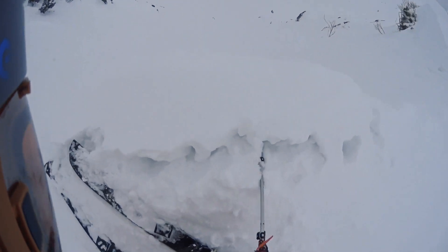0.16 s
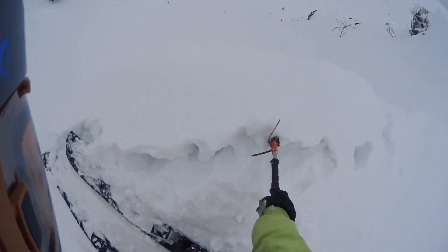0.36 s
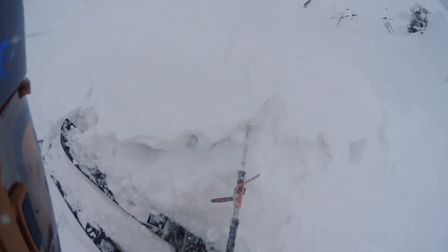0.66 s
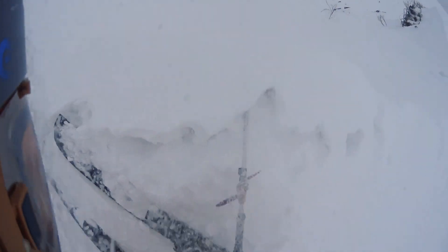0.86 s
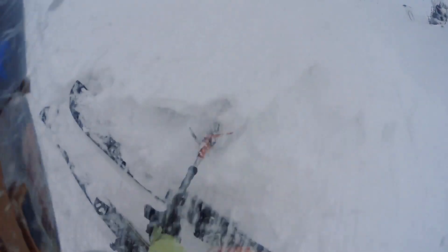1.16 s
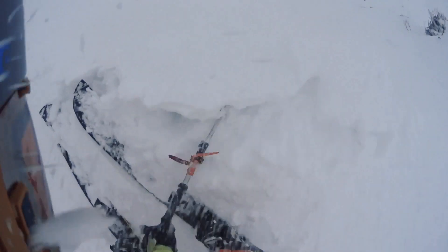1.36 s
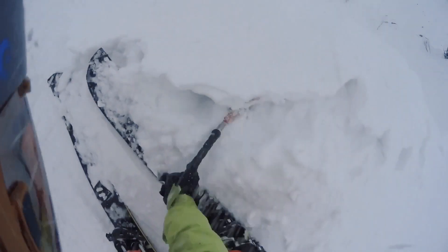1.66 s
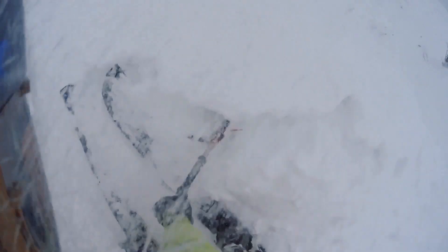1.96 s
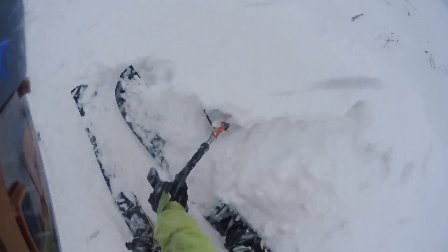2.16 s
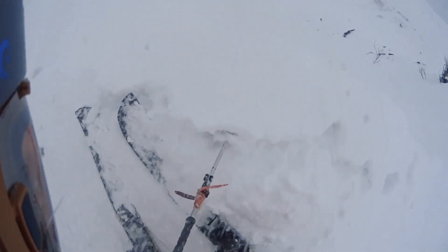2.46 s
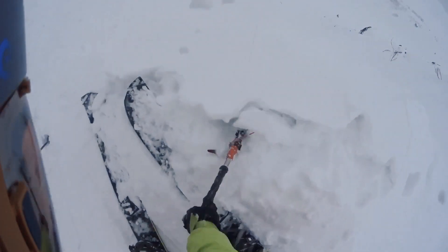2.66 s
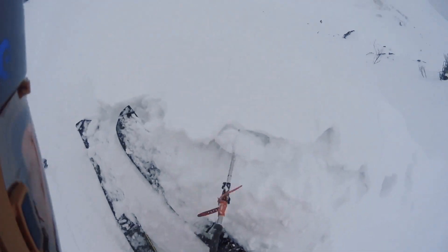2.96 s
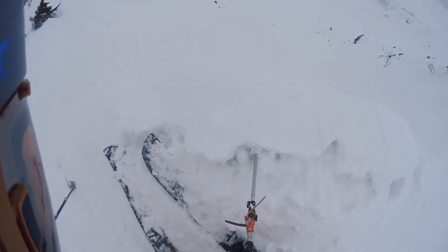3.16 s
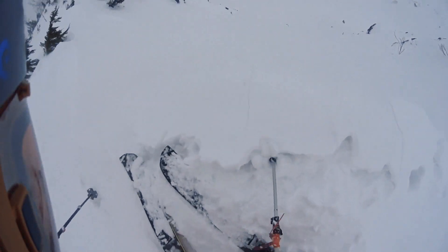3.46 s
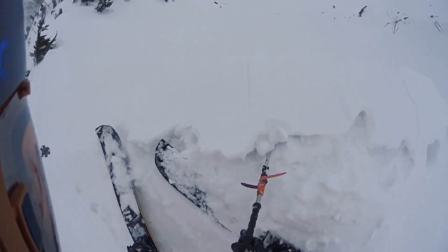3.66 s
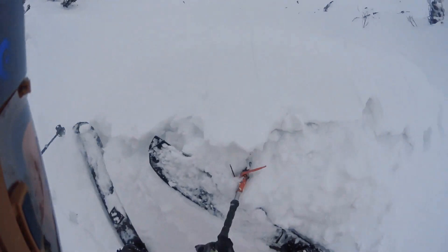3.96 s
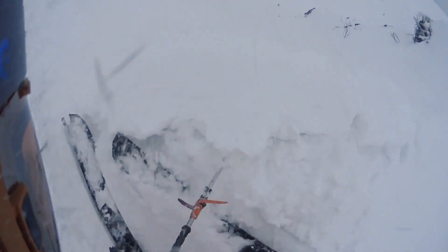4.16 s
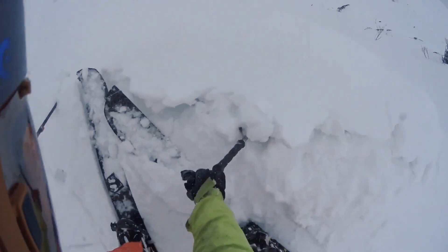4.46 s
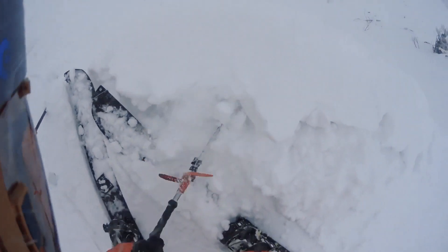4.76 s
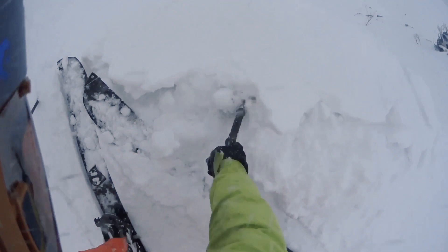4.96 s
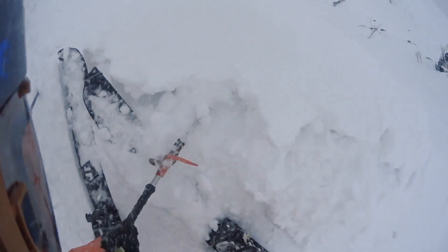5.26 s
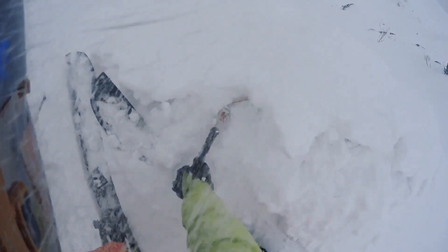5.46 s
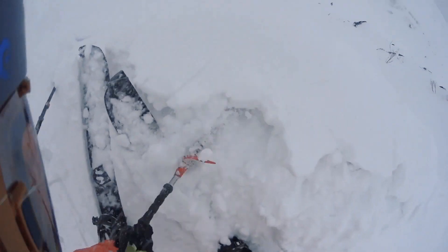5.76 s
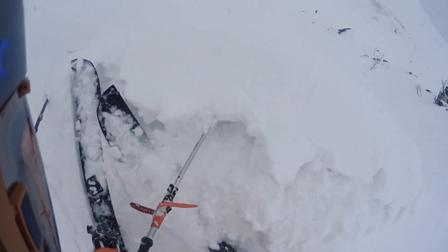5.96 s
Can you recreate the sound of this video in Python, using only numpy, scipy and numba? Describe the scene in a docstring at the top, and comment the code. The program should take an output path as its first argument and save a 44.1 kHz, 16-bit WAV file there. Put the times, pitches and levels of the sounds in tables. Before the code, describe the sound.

Open snowy slope, heard very close from a small stereo camera worn on a skier's body. Deep wind buffeting runs throughout. Packed snow crunches at first, then squalls of powder hiss and patter on the housing with soft thuds and icy ticks. The middle thins to mostly wind, then more crunching leads into a dense burst of sharp ticks and hissing snow, easing at the end.

```python
"""Skier in a snowstorm

A skier stamps and pokes into deep powder, heard by a small camera worn on the body, with two microphone ports.
Wind is coloured noise that swells in gusts; blown snow hisses as thousands of tiny hits ring the housing.
Clumps thud on the housing, ice grains tick and ring a port, the mount knocks, and pushed snow crunches.
A limiter briefly turns everything down around the loudest peaks."""
import sys
import numpy as np
from scipy import signal
from scipy.fft import rfft, irfft, next_fast_len
from scipy.io import wavfile
from scipy.ndimage import uniform_filter1d, minimum_filter1d
from numba import njit

SR = 44100
rng = np.random.default_rng(int(sys.argv[2]) if len(sys.argv) > 2 else 0)


def generate_wav(signal):
    """Clip the signal to [-1, 1] and save it as 16-bit WAV at the path in sys.argv[1]."""
    frames = np.transpose(np.atleast_2d(signal))
    scaled = np.clip(frames, -1, 1) * 32767
    pcm = np.round(scaled).astype(np.int16)
    wavfile.write(sys.argv[1], SR, pcm)


N = 269451
TIME = np.arange(N) / SR

# Snow blown against the housing, in squalls with thin drift between: [start_s, level_db]
SQUALLS = [(0, -73), (.5, -60), (.6, -34.5), (.8, -39), (1.22, -35.5), (1.45, -28), (1.75, -38),
           (1.92, -30), (2.12, -28), (2.28, -44), (2.7, -42.5), (2.8, -46.5), (3.05, -47.5), (3.6, -51),
           (4.02, -39.5), (4.17, -34), (4.55, -37), (4.8, -28.5), (5.1, -31), (5.5, -33.5), (5.8, -49.5),
           (6.11, -52)]
THICK_SNOW_DB = -31  # snow level that counts as thick
# A ski pushed through packed snow: [middle_s, length_s, level_db]
PUSHES = [(.12, 0.53, -30.5), (.45, 0.48, -31.5), (3.7, 0.36, -31.5), (3.812, 0.11, -25.5),
          (3.915, 0.19, -26), (3.97, 0.068, -21.5), (4.085, 0.25, -25)]


def undb(db):
    """Turn decibels into a gain."""
    return 10 ** (np.asarray(db) / 20)


def curve(rows, column=1, outside=None):
    """Join one column of a table by straight lines in time."""
    rows = np.asarray(rows)
    return np.interp(TIME, rows[:, 0], rows[:, column], left=outside, right=outside)


def swells(table, column=2):
    """Level in dB of events that each rise and fall as one arch; rows start with middle and length."""
    power = 0
    for row in table:
        phase = np.pi * np.clip((TIME - row[0]) / row[1], -.5, .5)
        power = power + undb(2 * row[column]) * np.cos(phase) ** 2
    return 10 * np.log10(power + 1e-12)


def together(a_db, b_db):
    """Add two levels by their power."""
    return 20 * np.log10(np.hypot(undb(a_db), undb(b_db)))


def noise(spectrum):
    """Noise of rms 1, coloured by [pitch_hz, level_db] points and fading beyond the first and the last."""
    size = next_fast_len(N)
    hz, db = np.transpose(spectrum)
    f = np.maximum(np.arange(size // 2 + 1) * SR / size, 1)
    gain = undb(np.interp(np.log(f), np.log(hz), db))
    gain *= np.minimum(f / hz[0], 1) * np.minimum(hz[-1] / f, 1) ** 2
    x = irfft(rfft(rng.standard_normal(size)) * gain, size)[:N]
    return x / x.std()


def pair(spectrum):
    """Unrelated noise for the two ports."""
    return np.array([noise(spectrum), noise(spectrum)])


def walk(rate):
    """A random level of spread 1 that slides to a new value about `rate` times a second."""
    hold = max(int(SR / rate), 2)
    steps = np.repeat(rng.standard_normal(N // hold + 1), hold)
    x = uniform_filter1d(steps, hold)[:N]
    return x / x.std()


def low_cut(x, hz):
    """Take away the bass, which tiny grains do not carry."""
    return signal.sosfilt(signal.butter(3, hz, "high", fs=SR, output="sos"), x)


def pan(x, left_db):
    """Weaken or strengthen the left port."""
    return x * undb([[left_db], [0]])


def ring(at, push, hz, width_hz):
    """One resonance, pushed at the given samples; complex, so that its phase can be turned."""
    drive = np.zeros(N, complex)
    np.add.at(drive, at, push)
    return signal.lfilter([1], [1, -np.exp((2j * np.pi * hz - np.pi * width_hz) / SR)], drive)


def housing(times, db, treble_db, knee_hz, near_port, scatter, patchy_db=0):
    """Hits ring the modes of the housing, each with its own phase and lag between the ports.

    Treble is in dB per octave above the knee, low for soft hits."""
    # Modes of the housing: [pitch_hz, width_hz, share_under_blown_snow_db, share_struck_near_port_db,
    # left_minus_right_db, left_lead_rad]
    housing_modes = [(1528, 150, 0, -3, -2.5, 1.69), (1810, 177, 2.5, 1, -4, 1.62),
                     (2136, 135, -1.5, -5.5, -3, 0.32), (2939, 400, 1, 12.5, -6.5, 2.33),
                     (4118, 320, -0.24, -6, -4, 0.13), (5264, 760, -2.5, -10, -1, 1.92),
                     (6335, 1560, 1.5, -23, -4.5, 1.96), (7040, 1300, -1, -33, -3.5, 3.3),
                     (10530, 1600, -9, -28, 1, 0.9)]
    drift_share = .018  # the modes wander in pitch as snow sticks and falls off
    caking_db = 0.8  # caked snow slowly favours one mode or another
    at = np.clip(times * SR, 0, N - 1).astype(int)
    modes = np.array(housing_modes)
    octaves = np.clip(np.log2(modes[:, 0] / knee_hz), 0, 1.5)
    share = undb(modes[:, 3 if near_port else 2] + np.outer(treble_db, octaves))
    share /= np.linalg.norm(share, axis=1, keepdims=True)
    drift_s = drift_share * np.cumsum(walk(rate=9)) / SR
    out = np.zeros((2, N))
    for (hz, width_hz, _, _, left_db, lead), part in zip(modes, share.T):
        size = undb(db) * part * np.sqrt(4 * np.pi * width_hz * .003)  # the level is an rms over 3 ms
        if patchy_db:
            size = size * undb((patchy_db * walk(rate=90) + caking_db * walk(rate=11))[at])
        push = size * np.exp(2j * np.pi * rng.random(len(at)))
        turn = lead + scatter * np.sqrt(hz / 3000) * rng.standard_normal(len(at))
        wander = np.exp(2j * np.pi * hz * drift_s)
        left_push = push * undb(left_db) * np.exp(1j * turn)
        out[0] += (wander * ring(at, left_push, hz, width_hz)).real
        out[1] += (wander * ring(at, push, hz, width_hz)).real
    return out


def mount(times, db):
    """Jolts ring the camera mount; the two ports hear the same, a little weaker on the left."""
    # What the mount rings with: [pitch_hz, width_hz, level_db]
    mount_modes = [(520, 240, -17), (1006, 290, 4), (1380, 150, 0.5), (2300, 610, 7.5)]
    at = np.clip(times * SR, 0, N - 1).astype(int)
    rings = sum(ring(at, undb(db + mode_db), hz, width_hz).imag for hz, width_hz, mode_db in mount_modes)
    return pan(rings, left_db=-3.5)


def grains(level_db, rate, spread_db):
    """Random hits, many small and a few large, that add up to the level curve: (times, dB)."""
    at = rng.integers(0, N, int(rate * N / SR))
    size = undb(spread_db * np.minimum(rng.exponential(size=len(at)), 5))
    size /= np.sqrt(np.mean(size ** 2) * rate * .003)  # the housing takes levels over 3 ms
    return at / SR, level_db[at] + 20 * np.log10(size)


def shatter(table, gap_s, fade_db, count=4):
    """Break each hit into a few pieces, later and weaker one after another: (times, dB, further columns)."""
    times, db, *rest = np.repeat(table, count, axis=0).T
    piece = np.tile(np.arange(count), len(table))
    return times + gap_s * (piece - rng.random(len(times))), db - fade_db * piece, *rest


def dip():
    """How far the level of wind and snow dips, in dB, with sloping edges to each dip."""
    # Short dips in the level of wind and snow: [middle_s, length_s, depth_db]
    dips = [(0.867, 0.028, -11), (1.23, 0.09, -3), (2.44, 0.025, -1), (2.85, 0.17, -14), (3.56, 0.02, -17),
            (4.012, 0.044, -20), (5.82, 0.16, -4.5), (6.08, 0.09, -4.5)]
    edge_share = 0.27  # share of its length taken to fall into a dip, and again to leave it
    drop_db = 0
    for middle, length, db in dips:
        inside = .5 - np.abs(TIME - middle) / length
        drop_db = drop_db + db * np.clip(inside / edge_share + .5, 0, 1)
    return drop_db


def wind():
    """Eddies rumble, reaching the right channel a fixed moment after the left; air hisses as it rushes by."""
    # Colours of the large eddies, small eddies, finest eddies and rushing air: [pitch_hz, level_db (per Hz)]
    buffet_colour = [(15, -11), (30, -9), (55, 0.5), (85, 1), (150, 0.5), (220, -8), (330, -34), (600, -59)]
    flutter_colour = [(90, -7), (180, 0), (260, 0.5), (380, -3.5), (500, -10), (700, -22.5), (1000, -29.5),
                      (1600, -30.5)]
    whirl_colour = [(380, -1), (480, 3), (620, 2.5), (800, 2), (1050, -7), (1500, -9)]
    rush_colour = [(400, -19), (800, 3), (1600, -18), (2300, 1.5), (3000, 3.5), (3800, -1), (7000, -7.5),
                   (11000, -6)]
    # Slow strength of the wind: [start_s, large_eddies_db, small_eddies_db]
    breeze = [(0, -31.5, -28.5), (.11, -28.5, -34.5), (.27, -28.5, -26), (.48, -28, -32.5),
              (1.12, -27, -29), (1.24, -31, -38.5), (1.38, -26, -26.5), (1.53, -31.5, -41.5),
              (1.62, -26, -31), (1.82, -24.5, -32.5), (2.08, -30, -31.5), (2.32, -27.5, -29),
              (2.55, -30, -27.5), (2.74, -32, -30), (2.97, -23.5, -26.5), (3.1, -29, -26),
              (3.5, -28.5, -27.5), (3.6, -27, -26.5), (3.76, -26.5, -27), (4.2, -26, -33), (4.56, -26, -28),
              (4.7, -33, -34.5), (4.88, -37, -37), (4.95, -27, -38), (5.03, -26, -28), (5.4, -24.5, -34.5),
              (5.62, -26.5, -23.5), (5.82, -30.5, -29), (6.11, -21, -26.5)]
    # Gusts that slam into the microphone: [middle_s, length_s, large_eddies_db, small_eddies_db]
    gusts = [(.29, 0.15, -32, -25.5), (.64, 0.21, -26, -26.5), (.97, 0.071, -27, -28.5),
             (1.06, 0.045, -19.5, -46), (1.16, 0.077, -23, -29.5), (1.285, 0.02, -12, -35),
             (1.335, 0.046, -19, -30), (1.40, 0.09, -23.5, -33), (1.615, 0.025, -29, -21.5),
             (1.73, 0.31, -40, -27), (2.165, 0.084, -29, -42), (2.27, 0.1, -45, -25.5),
             (2.45, 0.041, -17.5, -22), (2.98, .08, -36, -28), (3.14, 0.057, -23, -29),
             (3.27, 0.11, -31, -26), (3.375, 0.16, -24, -23), (3.46, 0.058, -22, -24.5),
             (3.69, 0.18, -19.5, -29), (3.885, 0.026, -23, -22), (4.08, 0.084, -30, -28),
             (4.175, 0.018, -17.5, -25), (4.335, 0.067, -19, -25), (4.47, 0.023, -12.5, -22),
             (4.72, 0.083, -29, -30), (5.0, 0.061, -21, -25), (5.23, 0.076, -28, -23.5),
             (5.345, 0.051, -32, -23.5), (5.48, 0.09, -18.5, -28), (5.11, 0.029, -17, -22.5),
             (5.64, 0.021, -32, -16)]
    right_delay_s = 0.00064
    dip_db = dip()
    eddy_dip_db = 0.31 * dip_db  # whirl and rush take the full depth
    buffet_db = together(curve(breeze), swells(gusts)) + eddy_dip_db
    small_db = together(curve(breeze, column=2), swells(gusts, column=3))
    flutter_db = small_db + eddy_dip_db
    surge_db = small_db - small_db.mean()
    churn = walk(rate=30)  # shared by the large and the small eddies
    buffet = noise(buffet_colour) * undb(buffet_db - 2.33 + 0.65 * churn)
    eddies = noise(flutter_colour) * undb(1.75 * walk(rate=50) + 0.72 * churn)
    # the finest eddies stay nearly as strong in and between gusts
    whirl_db = -35 + 0.28 * surge_db + dip_db + 4.0 * walk(rate=40)
    whirl = noise(whirl_colour) * undb(whirl_db)
    rumble = buffet + eddies * undb(flutter_db) + whirl
    both = np.array([rumble, np.interp(TIME - right_delay_s, TIME, rumble)])
    # a little of the turbulence is born at each port alone
    own = pair(buffet_colour) * undb(buffet_db - 14) + pair(flutter_colour) * undb(flutter_db - 11.5)
    # the rush comes in puffs that follow the eddies, and fades where the snow is thin
    puffs_db = 3.5 * np.tanh(.8 * eddies)
    thin_db = 0.29 * np.minimum(curve(SQUALLS) - THICK_SNOW_DB, 0)
    rush_db = -36 + 0.06 * surge_db + dip_db + puffs_db + thin_db
    return both + own + pair(rush_colour) * undb(rush_db)


def blown_snow():
    """Fine powder hisses on the housing in uneven flurries, with soft flakes and a few hard grains among it."""
    # Short flurries, thick in the squalls and faint in the drift between: [middle_s, length_s, level_db]
    flurries = [(.335, 0.093, -46.5), (.97, 0.16, -31), (1.105, 0.1, -26.5), (1.32, 0.045, -32),
                (1.405, 0.03, -30), (1.845, 0.1, -32.5), (2.04, 0.088, -30), (2.715, 0.086, -35.5),
                (3.68, 0.078, -38.5), (4.745, 0.1, -28), (4.83, 0.031, -34), (4.935, 0.21, -30),
                (5.715, 0.17, -37.5)]
    powder_db, flakes_db, sleet_db = 9, -0.5, 1  # kinds of grain, relative to the snow level
    flake_ceiling_db = -32.5  # snow level above which flakes gain no more from thicker snow
    brighten = 0.03  # treble, dB per octave, that powder gains with each dB of thicker snow
    snow_db = together(curve(SQUALLS), swells(flurries)) + 0.3 * dip()
    swirl = walk(rate=65)
    level_db = snow_db + swirl

    times, db = grains(level_db + powder_db, rate=4000, spread_db=-0.5)
    thickness_db = np.interp(times, TIME, snow_db - THICK_SNOW_DB)
    treble_db = 1.5 + brighten * thickness_db + 3.1 * rng.standard_normal(len(times))
    powder = housing(times, db, treble_db, knee_hz=2700, near_port=False, scatter=0.57, patchy_db=2.15)

    flake_level_db = np.minimum(snow_db, flake_ceiling_db) + flakes_db + 5.4 * swirl
    times, db = grains(flake_level_db, rate=590, spread_db=2.5)
    treble_db = np.full(len(times), -15.0)
    flakes = housing(times, db, treble_db, knee_hz=1780, near_port=False, scatter=0.36)

    times, db = grains(level_db + sleet_db, rate=120, spread_db=1.5)
    treble_db = 8 + 4 * rng.standard_normal(len(times))
    sleet = housing(times, db, treble_db, knee_hz=3160, near_port=True, scatter=0.66)
    return low_cut(powder + flakes + sleet, hz=1290)


def clumps():
    """Lumps crumble on the housing in a few pieces; the softest ring mostly its lowest modes."""
    # Soft clumps of snow: [start_s, level_db, treble_db (per octave)]
    clump_hits = [(.586, -14, -11), (.6055, -18, -9), (.6165, -13, -10), (.7332, -15, -2),
                  (.7496, -12.5, -35), (.9962, -10, -23), (1.2679, -16.5, -17), (1.3119, -20, 3),
                  (1.3309, -10, -19), (1.4651, -9.5, 4), (1.4978, -8, -23), (1.548, -12, -10),
                  (1.7399, -15.5, -3), (1.7588, -15, -15), (2.0058, -5, 4), (2.1021, -10, -13),
                  (2.166, -16, -15), (2.1815, -3.5, -11.5), (2.2685, -10.5, 4), (2.2902, -19, -3),
                  (2.4148, -17, -8), (2.5107, -27, 1), (2.5205, -14.5, -8), (2.5278, -11, -17),
                  (2.5732, -5.5, -26), (2.6334, -15.5, 4), (2.6718, -13, -5), (2.7297, -11, 0),
                  (4.1708, -9, -24), (4.181, -9.5, -8), (4.531, -16.5, -4), (4.6522, -9, -7),
                  (5.1007, -11, -27), (5.1613, -8, -17), (5.662, -14, -19)]
    times, db, treble_db = shatter(clump_hits, gap_s=.001, fade_db=10.5)
    times = times + 0.001467
    thuds = housing(times, db - 4.5, treble_db, knee_hz=1660, near_port=False, scatter=0.067)
    return low_cut(low_cut(thuds, hz=1060), hz=1060)  # twice, for a steeper cut


def ice(left_db=-6.0, lead=2.48):
    """Hard grains burst beside the right port: a sharp crack, then port and overtone ring for milliseconds."""
    # The hardest ice grains: [start_s, port_ring_db, crack_db]
    ice_hits = [(0.4309, -25, -15), (0.4393, -17, -38), (1.005, 1, -1), (1.1152, 0, -2), (1.4278, -4, -6),
                (1.4332, 2, 0), (1.4539, 0, -5), (1.4708, -3, 0), (1.5175, 1, -6), (1.5215, -14, -20),
                (1.5317, -8, -7), (1.5718, -7, -12), (1.679, -16, -8), (1.8653, 2, -7), (2.1309, 5, 3),
                (2.2697, -14, -7), (2.5112, -5, -11), (2.5428, -5, -4), (3.5486, 1, -4), (3.5549, -18, -20),
                (3.8277, 4, -6), (3.8517, -1, -3), (3.9266, -3, -3), (4.0001, 0, -10), (4.1303, 1, 0),
                (4.1452, 1, -6), (4.1865, -2, -15), (4.1924, -6, -2), (4.1958, -14, -8), (4.2039, 4, -4),
                (4.2145, 0, -5), (4.2246, -11, -17), (4.2466, 6, 2), (4.276, -4, -13), (4.2987, -1, -1),
                (4.3408, 0, 2), (4.4454, 7, 4), (4.497, 0, -8), (4.6174, -16, -13), (4.6946, 6, 0),
                (4.8011, -9, -2), (4.8056, -3, 0), (4.8158, -7, -10), (4.8707, 0, -3), (4.8818, -5, -10),
                (4.8898, -5, -1), (5.0191, 2, -2), (5.1291, 1, -7), (5.1694, 1, -3), (5.1738, -1, 3),
                (5.2566, -1, -2), (5.2758, -6, -4), (5.3164, -3, -5), (5.4049, -3, -8), (5.4801, -16, -7),
                (5.6525, -13, -7), (5.7014, -13, -11), (6.0918, -24, -23)]
    # Colour of the crack of a bursting grain: [pitch_hz, level_db (per Hz)]
    crack_colour = [(400, -12.5), (2000, -17), (4000, 4), (7000, 1.5), (9000, -10.5), (11000, 0)]
    port_hz, port_width_hz = 3030, 330  # typical pitch
    overtone_hz, overtone_width_hz, overtone_db = 6780, 1300, -4.5  # typical pitch; level against the crack
    pitch_scatter = 0.02  # each hit rings a little higher or lower
    rise_s, crack_decay_s = 0.000059, 0.00065  # the ring builds up just after the crack
    t = np.arange(SR // 80) / SR

    def ringing(hz, width_hz):
        """A decaying sine at both ports, the left one ahead in phase."""
        tone = np.sin(2 * np.pi * hz * t + np.array([[lead], [0]]))
        return tone * np.exp(-np.pi * width_hz * t) * (1 - np.exp(-t / rise_s))

    out = np.zeros((2, N))
    grit = 1.5 * np.tanh(pair(crack_colour))
    for start_s, ring_db, crack_db in ice_hits:
        start = int(start_s * SR)
        span = slice(start, start + len(t))
        port_detune, overtone_detune = 1 + pitch_scatter * rng.standard_normal(2)
        port = ringing(port_hz * port_detune, port_width_hz)
        overtone = ringing(overtone_hz * overtone_detune, overtone_width_hz)
        crack = grit[:, span] * np.exp(-t / crack_decay_s)
        out[:, span] += undb(2.5 + ring_db) * port
        out[:, span] += undb(1 + crack_db) * (crack + undb(overtone_db) * overtone)  # the crack sets it off
    return pan(out, left_db)


def scuff(width_hz=730.0):
    """Narrow noise whose centre glides down, unrelated at the two ports."""
    # A short scuff that slides down in pitch: [start_s, level_db, centre_hz]
    scuff_path = [(5.905, -69, 2020), (5.92, -31, 1846), (5.935, -63, 1370), (5.95, -36, 1000),
                  (5.98, -65, 850)]
    band = np.array([[width_hz / 50, 0], [width_hz / 2, 0]])
    swing = np.exp(2j * np.pi * np.cumsum(curve(scuff_path, column=2)) / SR)
    hiss = ((pair(band) + 1j * pair(band)) * swing).real
    return hiss * undb(curve(scuff_path, outside=-np.inf))  # silent outside the table


def knock():
    """Single dull jolts of the mount, and a fine grating of it while a ski is pushed."""
    # Dull knocks on the mount: [start_s, level_db]
    knocks = [(0.8218, -18), (1.4998, -25.5), (1.549, -25), (2.468, -34), (2.477, -35)]
    times, db = grains(swells(PUSHES) - 15, rate=360, spread_db=2.0)
    grating = mount(times, db)
    return mount(*np.transpose(knocks)) + low_cut(grating, hz=695)


def crunch():
    """Packed snow gives way in many small dull fractures and a few large ones, stronger on the right."""
    # Larger fractures: [start_s, level_db]
    cracks = [(.0722, -23), (.089, -14), (.1221, -21), (.1446, -24), (.187, -27), (.2982, -19), (.404, -29),
              (.4174, -15.5), (.4459, -16), (.4973, -12), (.501, -10), (3.7707, -14), (3.796, -16),
              (3.8147, -10), (3.897, -8.5), (3.9453, -11.5), (3.9553, -19), (3.98, -13), (4.0425, -11.5),
              (4.089, -10), (4.4972, -1)]
    push_db = swells(PUSHES) + 4.5 + 2.0 * walk(rate=54)
    times, db = grains(push_db, rate=810, spread_db=1.5)
    treble_db = -10 + 3 * rng.standard_normal(len(times))
    small = housing(times, db, treble_db, knee_hz=2170, near_port=True, scatter=0.43, patchy_db=1.3)
    muffled = signal.sosfilt(signal.butter(2, 5200, fs=SR, output="sos"), small)

    times, db = shatter(cracks, gap_s=0.000707, fade_db=4.5)
    treble_db = np.full(len(times), -14)
    large = housing(times, db - 7.5, treble_db, knee_hz=2820, near_port=True, scatter=0.41)
    return pan(low_cut(muffled, hz=1070) + low_cut(large, hz=1830), left_db=-2.5)


def scene():
    """Wind, snow and skier at the two ports."""
    return wind() + blown_snow() + clumps() + ice() + scuff() + knock() + crunch()


def top_cut(x):
    """Steep upper edge of the sound's band; all frequencies pass together, so ticks stay crisp."""
    edge = signal.firwin(301, 11150, window=("kaiser", 8), fs=SR)  # edge in Hz
    return signal.fftconvolve(x, edge[None], mode="same", axes=1)


@njit
def follow(over, hold, release):
    """Jump to each peak, hold it for some samples, then let go."""
    out, e, wait = np.empty(len(over)), 0., 0.
    for i in range(len(over)):
        wait -= 1
        if over[i] > e:
            e, wait = over[i], hold
        elif wait < 0:
            e *= release
        out[i] = e
    return out


def limiter(x, ceiling_db, ratio, hold_s, release_s):
    """Look a millisecond or so ahead and turn both channels down together where they pass the ceiling."""
    ahead = SR // 1000
    peak_db = 20 * np.log10(np.abs(x).max(axis=0) + 1e-9)
    over_db = np.maximum(peak_db - ceiling_db, 0) * (1 - 1 / ratio)
    over_db = -minimum_filter1d(-over_db, 2 * ahead)  # the largest value nearby
    held_db = follow(over_db, float(hold_s * SR), np.exp(-1 / (release_s * SR)))
    return x * undb(-uniform_filter1d(held_db, ahead))


def record(dry):
    """The limiter ducks around each hard tick; what slips past it overloads near full scale."""
    held = limiter(top_cut(dry), ceiling_db=-2.14, ratio=11.5, hold_s=.006, release_s=.011)
    return top_cut(np.clip(held, -.98, .98))


dry = scene()
out = record(dry)
generate_wav(out)
```